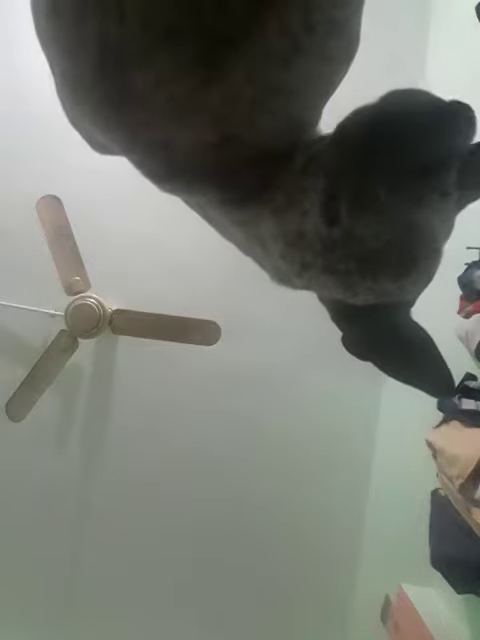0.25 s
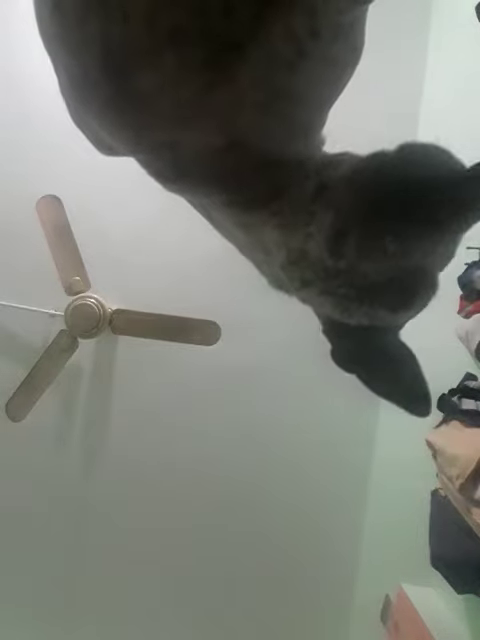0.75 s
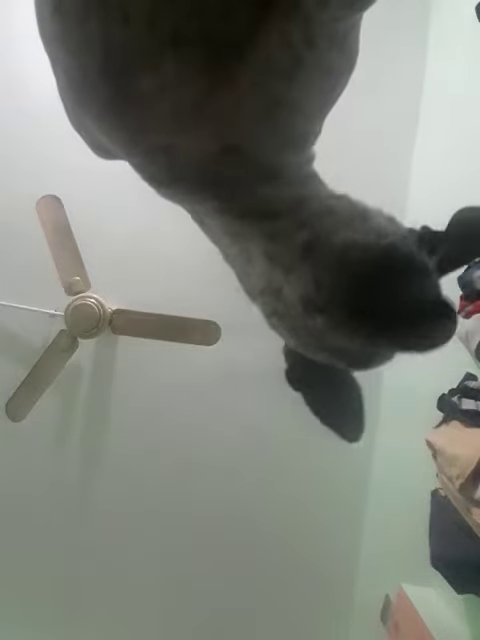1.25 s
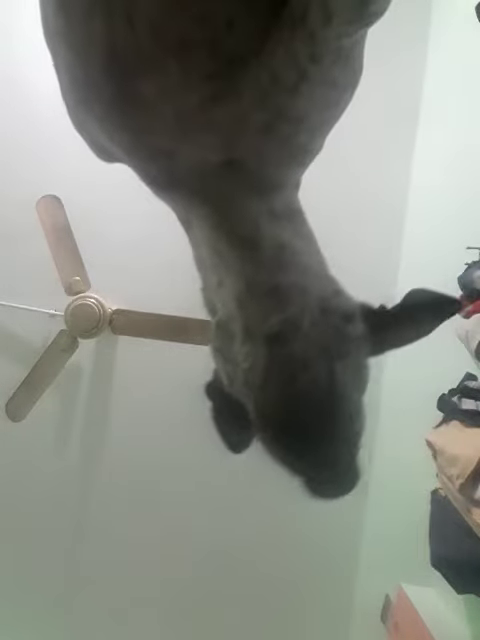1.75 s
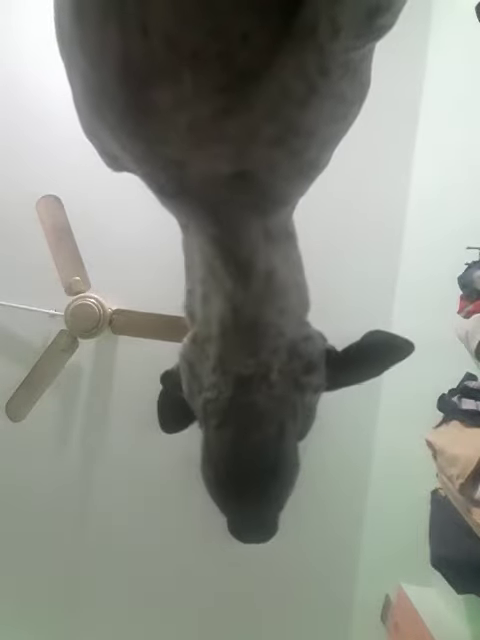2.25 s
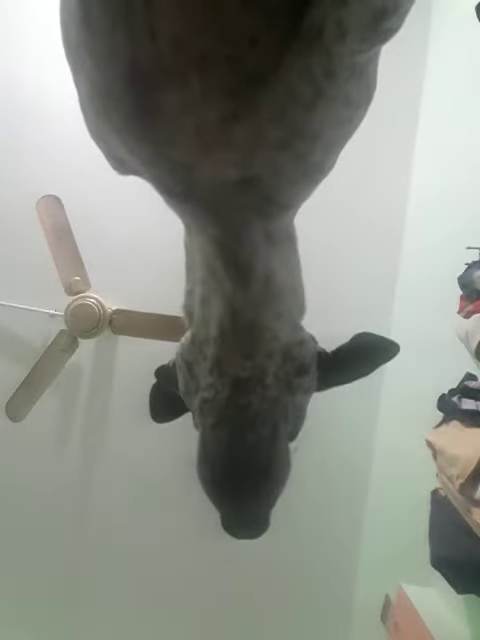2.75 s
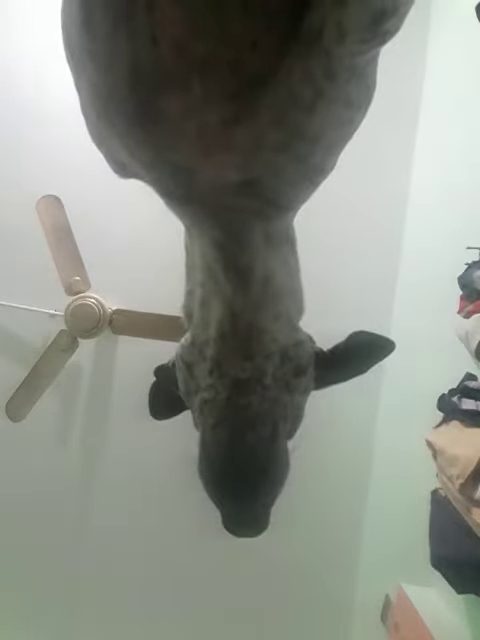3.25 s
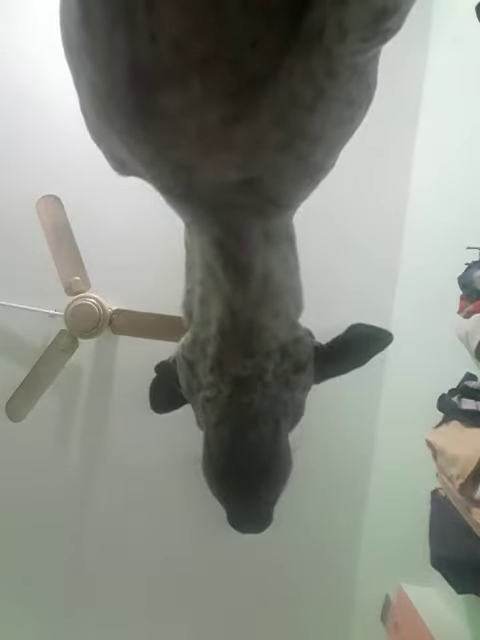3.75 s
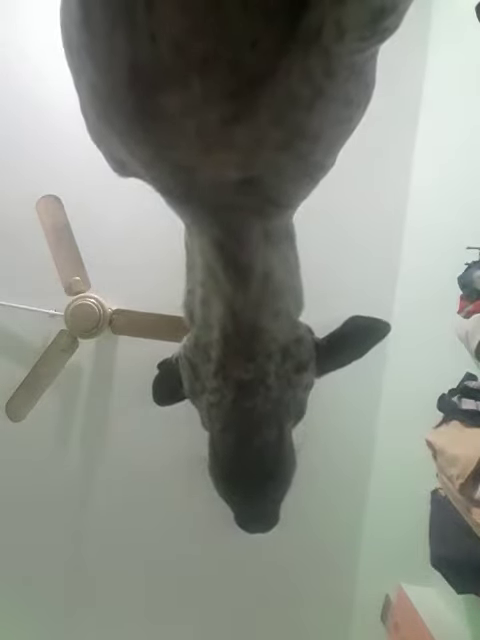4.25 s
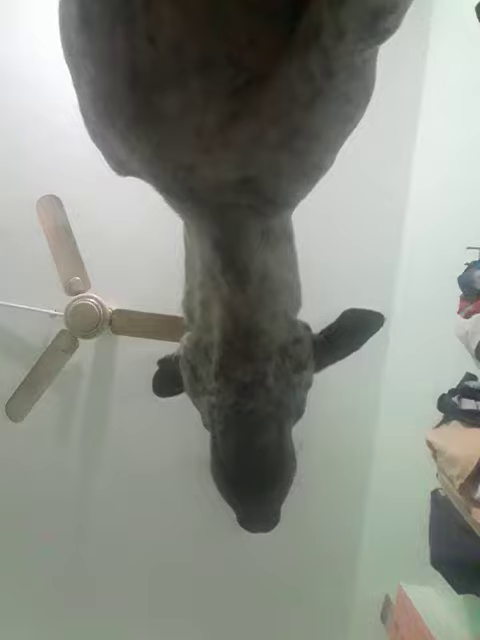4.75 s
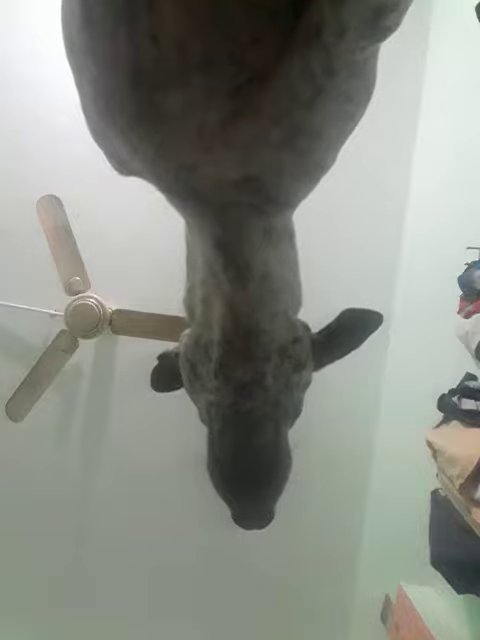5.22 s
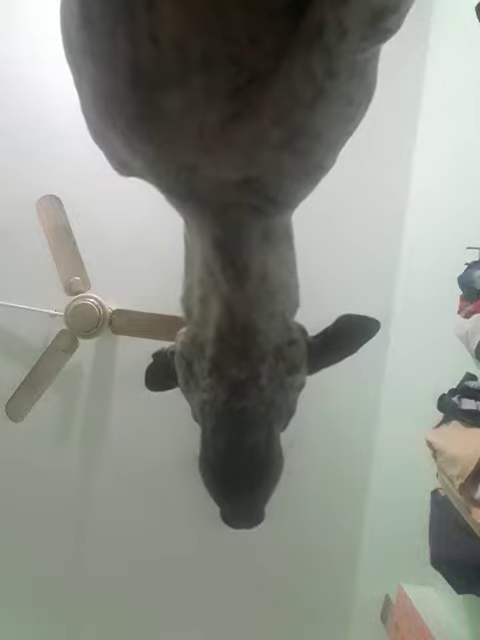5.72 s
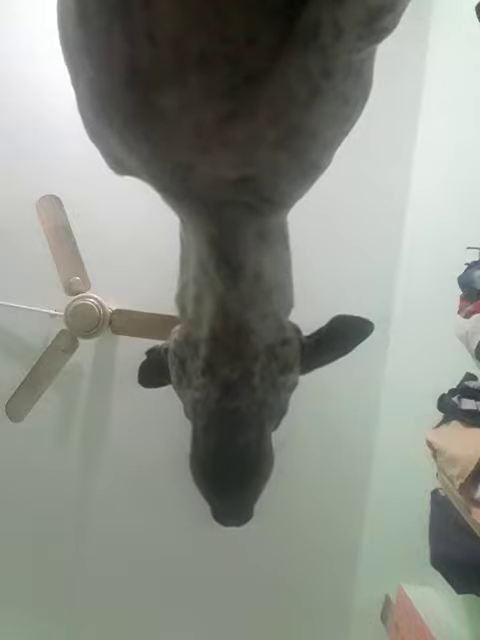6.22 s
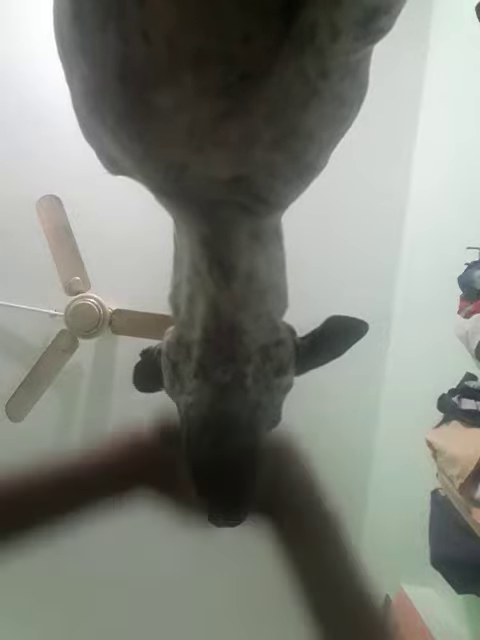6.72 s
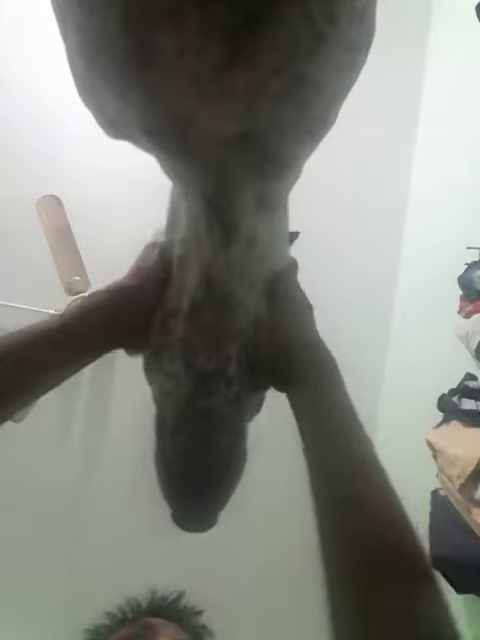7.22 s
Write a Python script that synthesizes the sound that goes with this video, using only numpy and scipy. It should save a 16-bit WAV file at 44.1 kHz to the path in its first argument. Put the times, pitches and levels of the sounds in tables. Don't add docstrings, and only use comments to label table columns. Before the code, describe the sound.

In a bare room, a dog's wet lip smacks and soft coat rustles give way to ten quick hand scratches through short fur over a faint low hum.

```python
import sys
import numpy as np
from scipy import signal
from scipy.fft import rfft, irfft, next_fast_len
from scipy.io import wavfile
from scipy.ndimage import uniform_filter1d, map_coordinates

SR = 44100
rng = np.random.default_rng(int(sys.argv[2]) if len(sys.argv) > 2 else 0)


def how_loud(loudness_db):
    steps = np.asarray(loudness_db, float) / 20
    return 10 ** steps


def dump_mix(stems):
    frames = np.atleast_2d(stems).T
    limited = np.clip(frames, -1, 1)
    pcm = np.round(limited * 32767).astype(np.int16)
    wavfile.write(sys.argv[1], SR, pcm)


N = 329868

# pitch in Hz, level in dB.
HUM_TONES = [(100, -83), (200, -85), (295, -86.5)]
# frequency in Hz, level in dB per
# Hz.
QUIET_COLOUR = [(15, -63.5), (25, -38), (37, -25), (102, -3.5), (144, -17), (205, -14), (222, -19.5),
                (324, -22.5),
                (435, -27), (707, -29), (977, -32.5), (6110, -38.5), (7380, -19.5), (8220, -37.5),
               (15700, -37)]
# frequency in Hz, level in dB per Hz.
CHANNEL_NOISE = [(15, -33.5), (25, -4), (148, -2), (324, -8.5), (727, -10), (2320, -10), (7380, -6.5),
                 (15700, -9)]
# frequency in Hz, level in dB.
TREBLE_LIMIT = [(15650, 0), (15850, -18), (16900, -23), (17150, -120)]
# frequency in Hz, time to fade by 60 dB in seconds.
ECHO_TIME = [(200, 1), (1000, .42), (4000, 0.44), (12000, 0.43)]
# frequency in Hz, level in dB.
ECHO_COLOUR = [(200, -7.5), (1000, 3.5), (4000, -3), (9000, -4.5), (15000, -5.5)]
# start in seconds, peak in dB, ring in Hz, thud in dB beside the ring,
# time for the ring to fade by 60 dB in seconds.
PAW_BUMPS = [(0.002, -48.5, 1310, -17, 0.011), (0.03, -61, 1725, -28, 0.037),
             (0.277, -59.5, 437, -19, 0.059), (0.735, -71.5, 700, 4.5, .014), (1.22, -39, 830, -8.5, 0.045),
             (1.25, -55, 992, -30, 0.054), (1.2205, -61, 330, -20, 0.022), (1.2218, -38, 2350, -36, 0.0099),
             (1.32, -64, 850, -40.5, .07), (1.764, -49, 456, 3.5, .02), (1.803, -30.5, 357, -7.5, 0.0051),
             (1.924, -46.5, 383, 0.8, 0.0078), (2.573, -56, 1430, -13.5, .02), (2.966, -39, 1108, -21, 0.1),
             (3.162, -59, 300, 8, 0.026), (3.519, -67, 2536, -22, 0.066)]
FINGER_TAPS = [(5.354, -26.5, 2310, -47, 0.024), (5.368, -42, 1200, -16.5, 0.029),
               (5.40, -55.5, 1040, -2.5, 0.045), (5.482, -38.5, 1430, -29, 0.032),
               (5.504, -55, 660, -5, 0.025), (5.605, -52, 247, -5, 0.019), (5.659, -38, 1016, -11.5, 0.038),
               (5.692, -45, 1010, -25, 0.034), (5.768, -54, 404, -12, .02), (5.924, -52, 505, -19, .02),
               (5.932, -46, 1020, -25, 0.027), (5.975, -51, 990, -26, 0.033), (5.638, -54, 600, 0, .015),
               (5.733, -44, 776, -3.5, 0.024), (5.885, -26.5, 1580, -30.5, 0.008),
               (5.895, -50.5, 523, -16, 0.043), (6.134, -53, 1350, -24, .036)]
# start in seconds, level in dB, echo in dB beside the direct sound.
FAR_THUMP = (3.924, -37, 6.3)
# pitch in Hz, level in dB, time to fade by 60 dB in seconds.
PANEL_TONES = [(277.4, -1.5, 0.064), (318, -11, 0.043), (496, 8, 0.017), (640, -10, 0.023),
               (1040, -8.5, 0.02), (1460, -10, 0.026), (1640, -24.5, 0.34), (2190, 0, 0.013),
               (3300, -28, 0.33)]
# loudest moment in seconds, half length in seconds,
# level in dB, low and top registers in dB beside it.
COAT_SLIDES = [(0.0, 0.13, -64.5, -3.5, -8), (0.208, 0.21, -68, -10, -8), (.35, 0.048, -72, -21, -7),
               (0.53, 0.088, -62, -7, -14), (0.62, 0.054, -68, -21, -3), (0.743, 0.21, -74.5, -11, -23),
               (1.09, 0.19, -70, -7.5, -8), (1.16, 0.08, -68.5, -12, 1.5), (1.553, 0.018, -70.5, 5, -6),
               (1.643, 0.0094, -59.5, 2, -17), (1.683, 0.045, -54.5, 0.5, -3), (2.78, 0.075, -64, -9, -18),
               (2.846, 0.035, -56.5, -11, -6), (2.875, 0.023, -66.5, 0, 2), (2.942, .021, -60, -11, -20),
               (4.443, 0.047, -86, 14, -8), (4.615, 0.12, -81, -12, -1.5), (5.036, 0.072, -64.5, -18, -6),
               (5.198, 0.12, -61, -14, 4.5), (6.693, 0.08, -78.5, -16.5, -10.5), (6.82, .15, -73, -14, -14),
               (7.001, 0.13, -77, -8, -2.5), (7.345, 0.14, -61, -18, -13.5),
               (7.48, 0.12, -62.5, -11, -16.5)]
# start in seconds, settling time in seconds,
# level in dB, low and top registers in dB beside it.
COAT_JERKS = [
    (2.792, 0.01, -44.5, -14, -9),
    (2.889, 0.022, -52, -18, -14),
    (3.923, 0.16, -57.5, -2, -9),
    (4.011, 0.081, -47.5, -4, -2.5),
    (4.1, 0.43, -64, -7, -21),
    (4.398, .05, -82.5, 12, -9.5),
    (6.44, 0.047, -61, 3, -12),
    (7.07, 0.14, -67, -7, -11),
]
# start in seconds, peak of the mouth cavity in dB, its pitch in Hz,
# low part in dB and bright part in dB beside the peak.
ASIDE_SMACKS = [(0.478, -58.5, 2500, -8, 6), (0.531, -44, 6300, -26, -11), (0.539, -48, 4330, -27, -7),
                (0.546, -43.5, 5400, -21, -9), (1.2207, -38, 4690, -6.5, 7),
                (1.5327, -57.5, 3200, -4, -15.5), (1.6448, -40.5, 4470, -4, 0.5),
                (1.6581, -36.5, 4370, 3, -13), (1.7374, -23, 4020, -3, -1),
                (1.7649, -10.5, 3418, -19.5, -6.5), (1.8019, -9.5, 4120, -24.5, -0.5),
                (1.8026, -16.5, 3250, -23, -13.5), (1.8167, -13.5, 4100, -12.5, -3),
                (1.924, -11.5, 4540, -9, 1.5)]
DOWN_SMACKS = [(2.573, -45, 8660, -17.5, -17), (2.662, -57, 3140, -2.5, -2),
               (2.7814, -53.5, 5080, -24.5, 4), (2.7885, -46, 3330, -24.5, 14),
               (2.8883, -52.5, 5116, -7, 16), (2.8862, -30, 8610, -37.5, -37),
               (2.905, -60.5, 4815, -8.5, 9.5), (2.922, -62.5, 4000, -10, 7.5),
               (2.9333, -48, 6250, -20.5, -12), (2.965, -22, 2244, 2, -2.5), (2.966, -25, 3235, -12.5, -4),
               (3.038, -63.5, 2970, -2.5, 9), (3.054, -36, 3020, -5.5, -20), (3.0909, -31, 2955, -7.5, -1),
               (3.1215, -34.5, 2916, -2.5, 3.5), (3.158, -33.5, 2766, -4, -1.5),
               (3.161, -14.5, 4610, -4, 7), (3.1609, -15.5, 3190, -13.5, -12)]
STRAY_TICKS = [(3.917, -51, 3000, -17, 3), (4.0076, -37, 3720, -9, 1), (4.025, -43, 5500, -17, 3),
               (4.3984, -57, 3670, 0, -6), (5.118, -70.5, 3950, -1, 14), (5.1415, -53, 6000, -9, 11),
               (5.157, -57, 2490, -5, 4), (5.398, -35, 2400, -5, 4), (5.5043, -24.5, 2250, -19, 7),
               (5.638, -42, 2000, -2, 5), (6.141, -51, 2230, -5, -3), (6.224, -56, 2090, -7, -5),
               (7.0623, -43, 4290, -18, 7)]
# highest register in dB, floor echo in dB, room in dB,
# half width of the cavity peak as a share of its pitch, steepness of the bass cut (a plain number).
BOUT_SETTINGS = [
    (-16, -6.5, -2.5, 0.12, 9.5),
    (-9, -7, 0.87, 0.13, 20),
    (-25, -10, -3.5, .13, 11.6),
]
# fastest moment in seconds, time speeding up in seconds, time slowing in seconds,
# level in dB, low and top registers in dB beside the middle.
SCRATCHES = [
    (5.247, 0.06, 0.08, -49, -0.5),
    (5.374, 0.062, 0.07, -39, -3),
    (5.508, 0.077, 0.049, -37, -4.5),
    (5.606, 0.056, 0.088, -37.5, -2),
    (5.757, 0.079, 0.071, -38, -5.5),
    (5.865, 0.069, 0.073, -38, -3.5),
    (6.006, 0.057, 0.043, -32, -12.5),
    (6.112, 0.048, 0.061, -34, -7),
    (6.255, 0.076, .065, -38.5, -6),
    (6.354, 0.043, 0.1, -41.5, -4.5),
]
# moment in seconds, half length in seconds, dB beside its stroke.
DEEP_RASPS = [
    (5.228, 0.042, -11),
    (5.386, 0.035, -13.5),
    (5.486, 0.057, -17),
    (5.636, 0.042, -20.5),
    (5.746, 0.067, -17),
    (5.896, 0.054, -20.5),
    (5.974, 0.071, -27.5),
    (6.142, 0.039, -27),
    (6.23, 0.045, -13),
    (6.368, 0.03, -18),
]
# frequency in Hz, level in dB per Hz.
LOW_FUR = [(700, -52.5), (1500, -20.5), (2300, -2.5), (3300, 5.5), (4600, 1), (6500, -5.5), (8000, -42.5)]
# frequency in Hz, level in dB per Hz.
MIDDLE_FUR = [(3000, -54), (4500, -19), (6300, -5.5), (8600, -1.5), (10500, -12), (13000, -25.5),
              (15000, -52)]
# frequency in Hz, level in dB per Hz.
TOP_FUR = [(7000, -62.5), (9500, -11.5), (11500, 2.5), (13000, 3), (15600, -0.5), (15900, -57)]
# frequency in Hz, level in dB per Hz.
RASP_COLOUR = [(700, -50), (1150, -13.5), (1600, -2), (2200, 4), (3000, -18), (4000, -48)]
# frequency in Hz, level in dB per Hz.
SHAKE_COLOUR = [(15, -24), (35, -4), (150, 6), (400, -28.5)]
# start in seconds, length in seconds, first pitch in Hz, last pitch in Hz,
# level in dB.
HOLLOW_NOTES = [(0.197, 0.12, 1164, 1215, -79.5), (0.459, 0.087, 1700, 1764, -76.5),
                (0.696, 0.039, 1640, 1840, -71.5), (0.743, 0.051, 1960, 2320, -74),
                (2.779, 0.092, 3300, 3200, -66.5), (2.926, 0.029, 3300, 3300, -61),
                (1.213, 0.092, 4730, 4640, -65), (3.92, .16, 1648, 1637, -61.5),
                (4.079, 0.18, 1650, 1640, -77.5), (4.206, 0.11, 1640, 1640, -79),
                (4.144, 0.14, 3390, 3200, -80), (5.199, 0.044, 1482, 2230, -63),
                (5.24, 0.049, 1990, 2950, -59), (5.347, 0.034, 2070, 3130, -54),
                (5.393, 0.017, 1876, 2094, -47), (5.468, 0.027, 2104, 1303, -60),
                (5.593, 0.0203, 2570, 3100, -50), (5.644, 0.031, 2010, 2190, -55),
                (5.716, 0.064, 2870, 2444, -51.5), (5.841, 0.043, 3000, 2630, -51),
                (5.882, 0.11, 1007, 1012, -72.5), (6.086, 0.047, 2800, 3300, -48.5),
                (6.118, 0.049, 1274, 1716, -56.5), (6.201, 0.067, 2200, 1478, -60),
                (6.335, 0.046, 2420, 3460, -51)]


def unit(x):
    return x / np.sqrt(np.mean(x ** 2) + 1e-20)


def along(points, hz):
    f, v = np.transpose(points)
    return np.interp(np.log(hz + 1), np.log(f + 1), v)


def wobble(rate):
    points = rng.standard_normal(int(N * rate / SR) + 4)
    return map_coordinates(points, [np.arange(N) * rate / SR])


def coloured(x, spectrum):
    m = next_fast_len(N + 8192)
    gain = how_loud(along(spectrum, np.fft.rfftfreq(m, 1 / SR)))
    return unit(irfft(rfft(x, m) * gain, m)[:N])


def band(x, lo_hz, hi_hz):
    sos = signal.butter(4, [lo_hz, min(hi_hz, SR / 2 - 500)], "band", fs=SR, output="sos")
    y = signal.sosfilt(sos, x)
    return y / np.linalg.norm(y, axis=-1, keepdims=True)


def ring(hz, t60, t):
    return np.sin(2 * np.pi * hz * t) * how_loud(-60 * t / t60)


def quiet():
    t = np.arange(N) / SR
    hum = np.zeros(N)
    for hz, db in HUM_TONES:
        level = how_loud(db + 3.0 + 5.1 * wobble(24))
        hum += level * np.sin(2 * np.pi * hz * t + 1.8 * wobble(6.6))
    noise = coloured(rng.standard_normal(N), QUIET_COLOUR)
    return how_loud(-65.5 - 4.08 + 0.21 * wobble(0.69)) * noise + hum


def room(x):
    out, size = np.zeros(N + SR), 4096
    for k in range(0, N, size):
        hz, t, z = signal.stft(rng.standard_normal(SR // 2), SR, nperseg=256)
        fade_db = along(ECHO_COLOUR, hz)[:, None] - 60 * t / along(ECHO_TIME, hz)[:, None]
        tail = signal.istft(z * how_loud(fade_db), SR, nperseg=256)[1]
        tail *= 1 - np.exp(-np.arange(len(tail)) / SR / 0.0045)
        wet = signal.fftconvolve(x[k:k + size], tail / np.linalg.norm(tail))
        out[k:k + len(wet)] += wet
    return out[:N]


def thump():
    t = np.arange(SR // 4) / SR
    s, db, wet_db = FAR_THUMP
    blow = sum(how_loud(level) * ring(hz, t60, t) for hz, level, t60 in PANEL_TONES)
    blow *= 1 - np.exp(-t / 0.0027)
    blow += how_loud(7.5) * band(rng.standard_normal(len(t)) * how_loud(-60 * t / 0.019), 930, 4000)
    return s, how_loud(db) * blow * how_loud([[0], [wet_db]])


def knocks():
    out, t = np.zeros((2, N + SR)), np.arange(SR // 4) / SR
    for s, db, ring_hz, thud_db, t60 in [*PAW_BUMPS, *FINGER_TAPS]:
        thud = band(rng.standard_normal(len(t)) * how_loud(-60 * t / 0.035), 250, 900)
        tone = ring(ring_hz, t60, t) * (1 - np.exp(-t / 0.0015))
        knock = how_loud(db) * (tone + how_loud(thud_db + 20.5) * thud)
        out[:, round(s * SR):][:, :len(t)] += knock * how_loud([[0], [-8.5]])
    s, blow = thump()
    out[:, round(s * SR):][:, :len(t)] += blow
    return out[:, :N]


def hairs(rate, spread_db, patchy_db):
    size_db = np.minimum(spread_db * rng.exponential(size=N), 9)
    snaps = (rng.random(N) < rate / SR) * how_loud(size_db) * rng.uniform(-0.59, 1, size=N)
    z = signal.stft(unit(snaps) * 0.41 + rng.standard_normal(N), nperseg=256)[2]
    field = uniform_filter1d(rng.standard_normal(z.shape), size=4, axis=0)
    field = uniform_filter1d(field, size=5, axis=1)
    return signal.istft(z * how_loud(patchy_db * unit(field)), nperseg=256)[1][:N]


def fur(gains, rough_db, patchy_db):
    slip = hairs(rate=2000, spread_db=3.5, patchy_db=patchy_db)
    grip = rough_db * wobble(60)
    out = np.zeros(N)
    for gain, colour in zip(gains, (LOW_FUR, MIDDLE_FUR, TOP_FUR)):
        out += gain * how_loud(grip + 0.95 * wobble(60)) * coloured(slip, colour)
    return out


def brushing():
    t = np.arange(0, N, 32) / SR
    power = np.zeros((3, len(t)))
    fade = 13.5
    for s, half, db, low_db, top_db in COAT_SLIDES:
        beside_db = np.array([[low_db], [0], [top_db]])
        power += how_loud(2 * (db - fade * np.abs((t - s) / half) ** 1.2 + beside_db))
    for s, settle, db, low_db, top_db in COAT_JERKS:
        since = np.maximum(t - s, 0)
        rise = (1 - np.exp(-since / 0.0021)) ** 2
        beside_db = np.array([[low_db], [0], [top_db]])
        power += rise * how_loud(2 * (db - fade * since / settle + beside_db))
    gains = [np.interp(np.arange(N) / SR, t, g) for g in np.sqrt(power)]
    return fur(gains, rough_db=0.6, patchy_db=1.3)


def causal(gain):
    cep = irfft(np.log(gain + 1e-6))
    cep[1:len(cep) // 2] *= 2
    cep[len(cep) // 2 + 1:] = 0
    return irfft(np.exp(rfft(cep)))


def mouth_cavity(hz, low_db, bright_db, top_db, narrow, steep):
    f = np.fft.rfftfreq(1024, 1 / SR)
    peaks = [(1500, 550, low_db + 2.5), (hz, hz * narrow, 2), (6300, 850, bright_db - 7.0),
             (8800, 850, bright_db - 4.5), (13800, 2600, top_db + bright_db - 5)]
    power = sum(how_loud(2 * level) / (1 + np.abs((f - centre) / width) ** 3) for centre, width, level in peaks)
    return causal(np.sqrt(power / (1 + (1060 / (f + 1)) ** steep)))


def seal_crack():
    t = np.arange(1024) / SR
    crack = rng.standard_normal(len(t)) * np.exp(-(t / 0.0015) ** 2) * (1 - np.exp(-t / 0.0001))
    grain = rfft(crack)
    return irfft(grain / uniform_filter1d(np.abs(grain), size=11))[:400]


def smacks():
    out = np.zeros((2, N + SR))
    for rows, bout in zip((ASIDE_SMACKS, DOWN_SMACKS, STRAY_TICKS), BOUT_SETTINGS):
        top_db, echo_db, wet_db, narrow, steep = bout
        for s, db, hz, low_db, bright_db in rows:
            mouth = how_loud(db + 21) * mouth_cavity(hz, low_db, bright_db, top_db, narrow, steep)
            size = len(mouth)
            pop = unit(signal.fftconvolve(seal_crack(), mouth)[:size]) * np.std(mouth)
            start = round((s + 0.0005) * SR)
            floor = start + round(0.0037 * SR)
            out[0, start:][:size] += pop
            out[0, floor:][:size] += how_loud(echo_db) * uniform_filter1d(pop, size=3)
            out[1, start:][:size] += how_loud(wet_db) * mouth
    return out[:, :N]


def hollow():
    out = np.zeros(N)
    for s, length, from_hz, to_hz, db in HOLLOW_NOTES:
        u = np.linspace(0, 1, round(length * SR))
        flutter = unit(uniform_filter1d(rng.standard_normal((2, 8192)), size=90, axis=1))[:, :len(u)]
        phase = 2 * np.pi * np.cumsum(from_hz + (to_hz - from_hz) * u) / SR
        tone = flutter[0] * np.sin(phase) + flutter[1] * np.cos(phase)
        out[round(s * SR):][:len(u)] += how_loud(db) * np.sin(np.pi * u) * tone
    return out


def scratching():
    t, gains, press = np.arange(N) / SR, np.zeros((3, N)), np.zeros(N)
    for (s, rise, fall, db, beside_db), (deepest, half, rasp_db) in zip(SCRATCHES, DEEP_RASPS):
        phase = np.interp(t, [s - rise, s, s + fall], [0, np.pi / 2, np.pi])
        speed = np.abs(np.sin(phase))
        register_db = np.array([[beside_db], [0], [beside_db + 1]])
        gains += speed ** 1.83 * how_loud(db + register_db)
        press += how_loud(db + rasp_db) * np.cos(np.pi / 2 * np.clip((t - deepest) / half, -1, 1)) ** 2
    grit = hairs(rate=600, spread_db=4, patchy_db=4)
    rasp = press * how_loud(3.1 * wobble(80)) * coloured(grit, RASP_COLOUR)
    shake = how_loud(-27.0) * gains[0] * coloured(rng.standard_normal(N), SHAKE_COLOUR)
    return fur(gains, rough_db=1.0, patchy_db=2.8) + rasp + hollow() + shake


def scene():
    knock, knock_far = knocks()
    lips, lips_far = smacks()
    rub = scratching()
    wet = room(how_loud(-8) * lips_far + knock_far + how_loud(-10.5) * rub)
    return np.tile(quiet() + knock + wet + brushing() + lips + rub, (2, 1))


def band_limit(x):
    return signal.sosfilt(signal.butter(12, 17100, fs=SR, output="sos"), x)


def record(dry):
    m = next_fast_len(N)
    limit = how_loud(along(TREBLE_LIMIT, np.fft.rfftfreq(m, 1 / SR)))
    x = irfft(rfft(dry, m) * limit, m)[:, :N]
    apart = how_loud(-79.0) * coloured(rng.standard_normal(N), CHANNEL_NOISE)
    return band_limit(x + apart * np.array([[1], [-1]]))


dry = scene()
out = record(dry)
dump_mix(out)
```